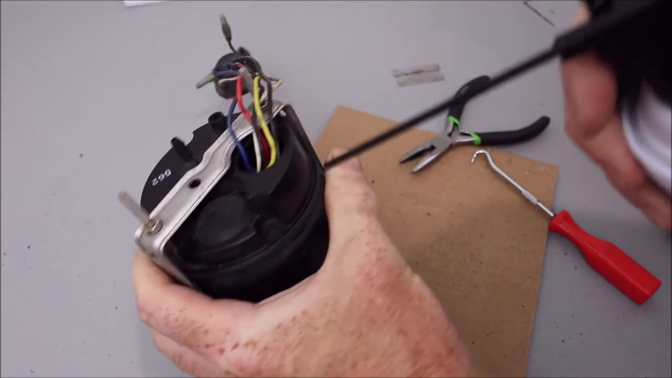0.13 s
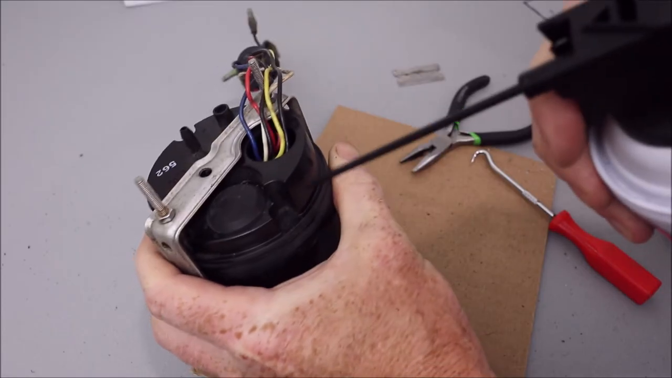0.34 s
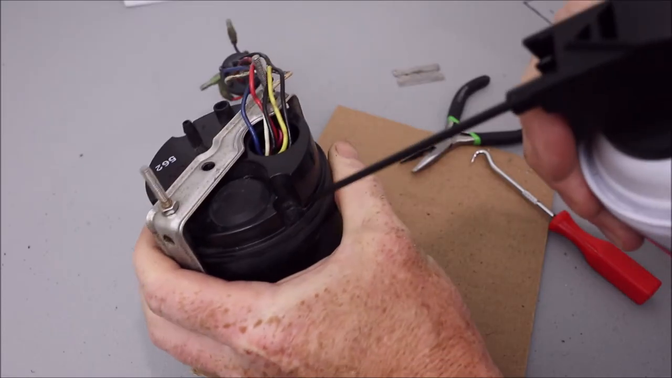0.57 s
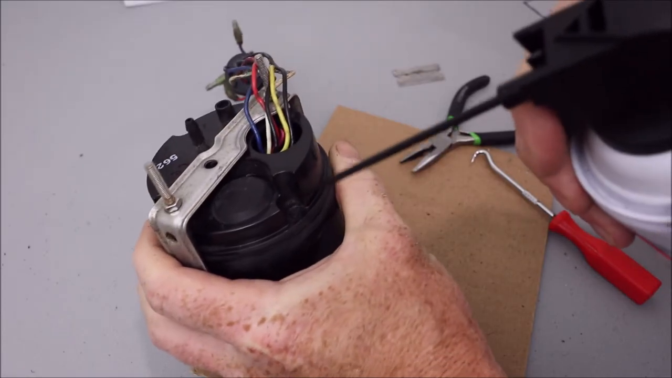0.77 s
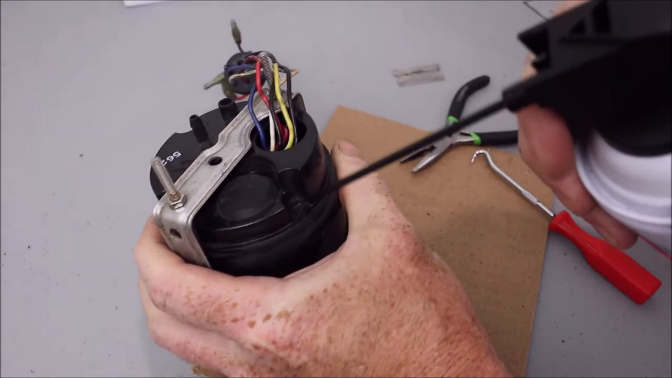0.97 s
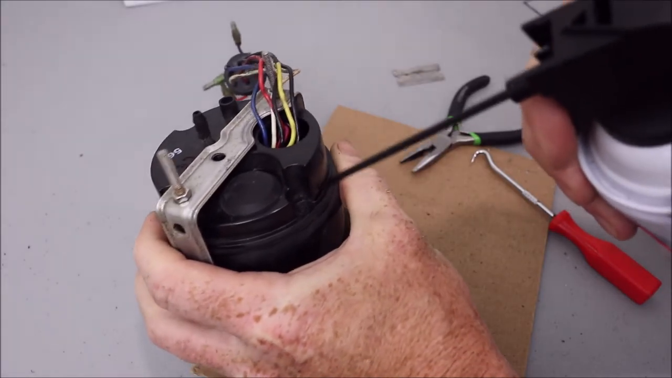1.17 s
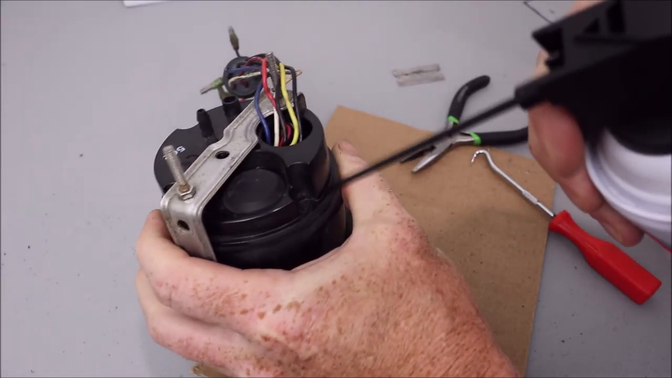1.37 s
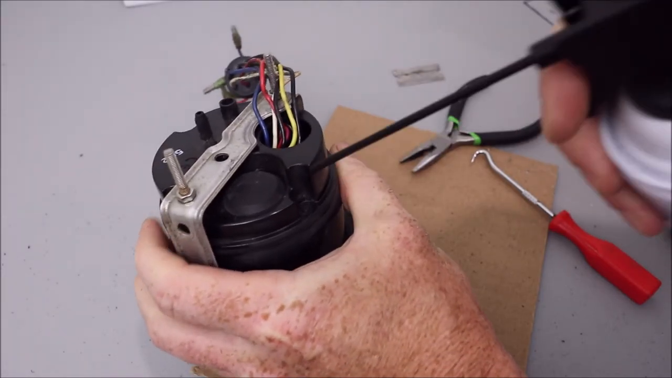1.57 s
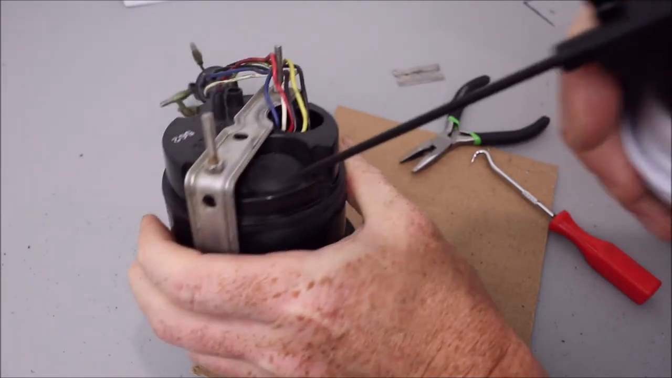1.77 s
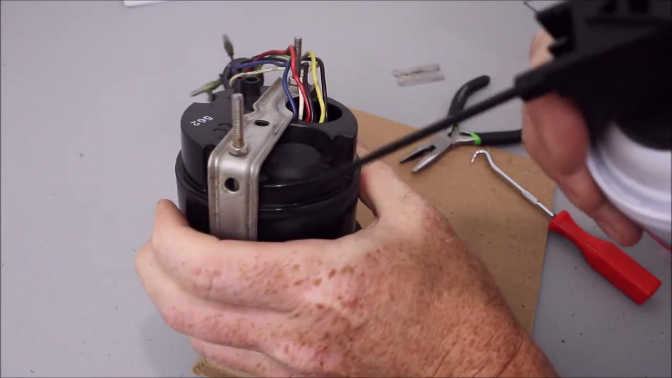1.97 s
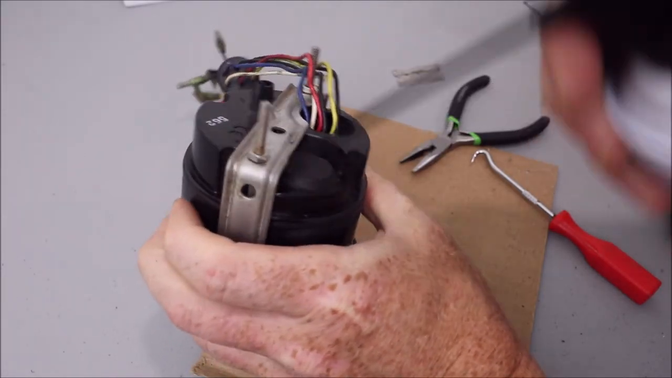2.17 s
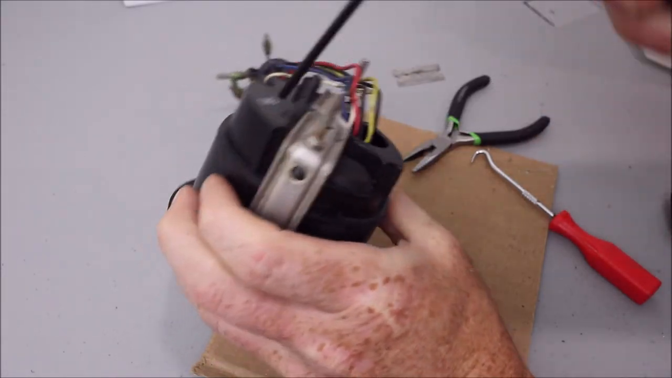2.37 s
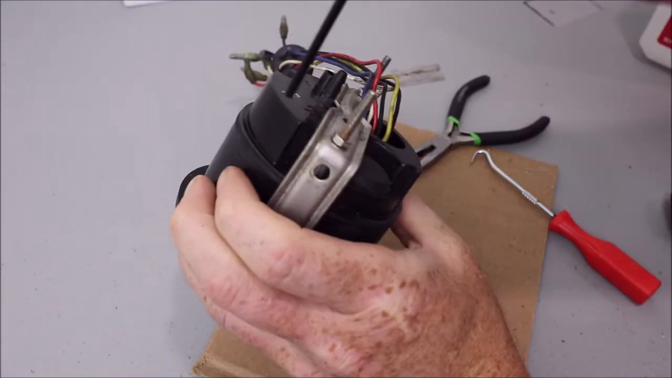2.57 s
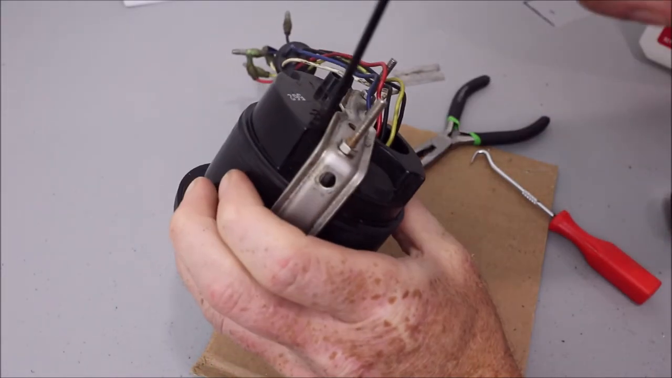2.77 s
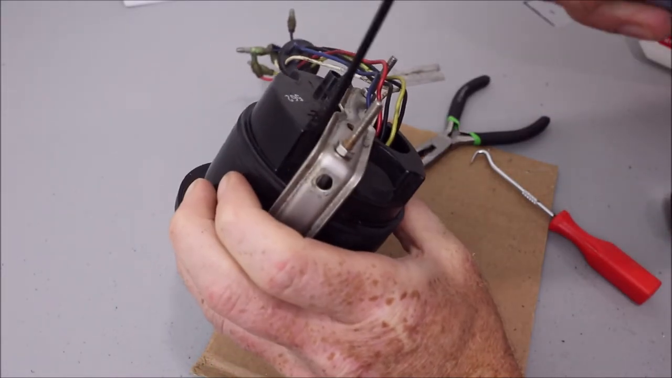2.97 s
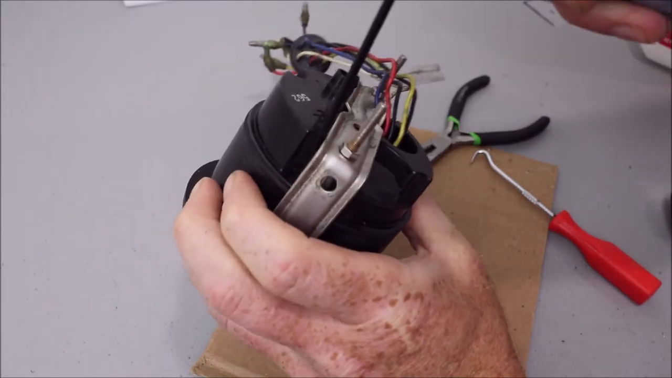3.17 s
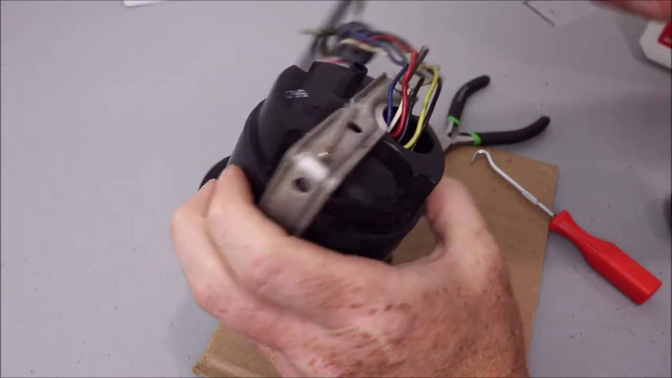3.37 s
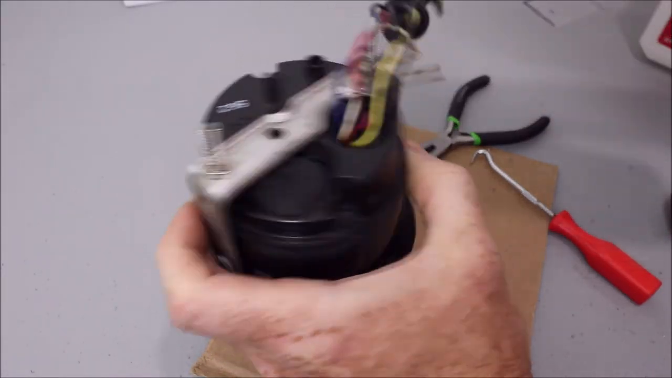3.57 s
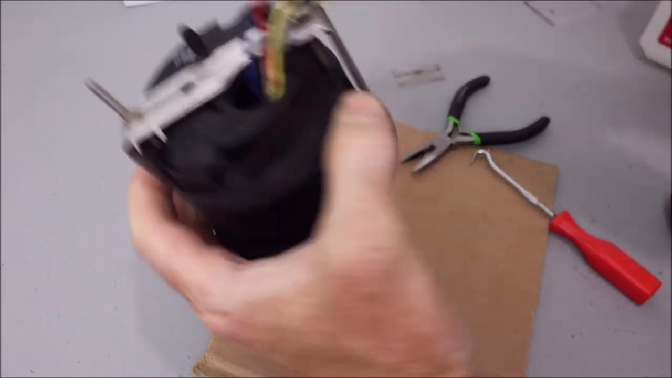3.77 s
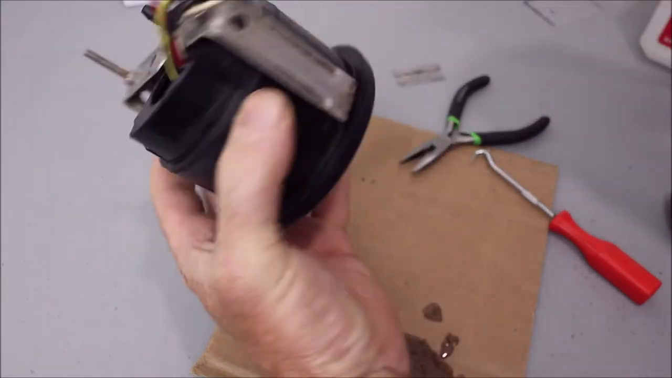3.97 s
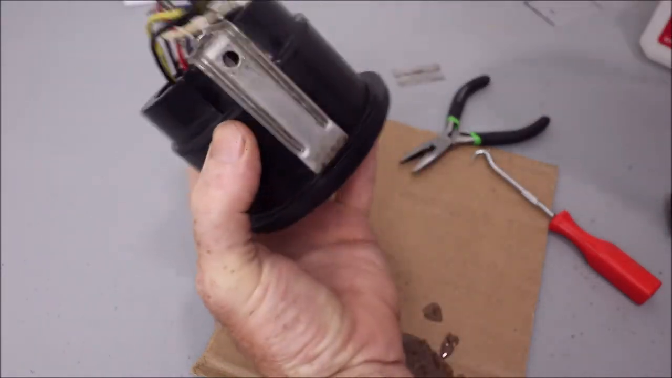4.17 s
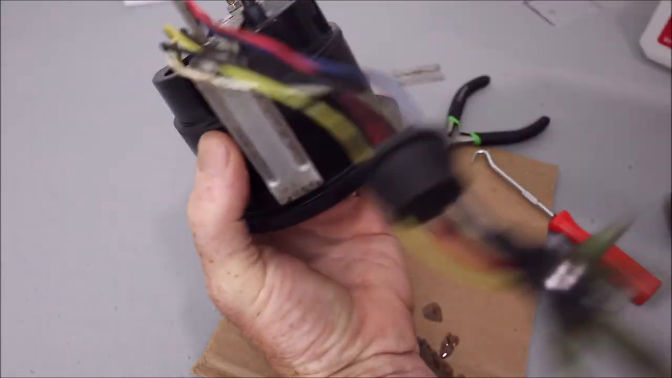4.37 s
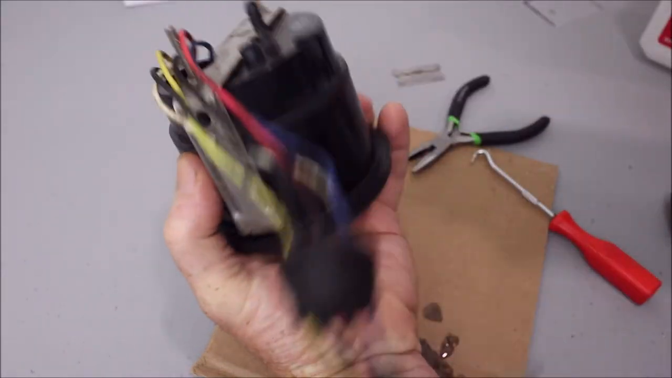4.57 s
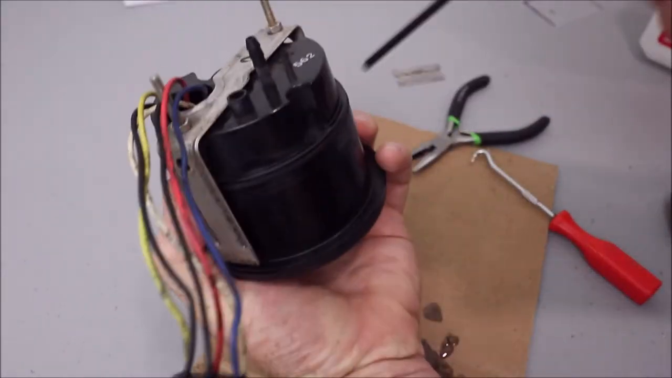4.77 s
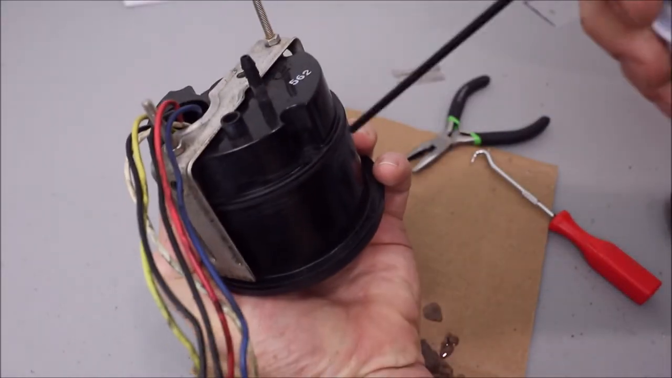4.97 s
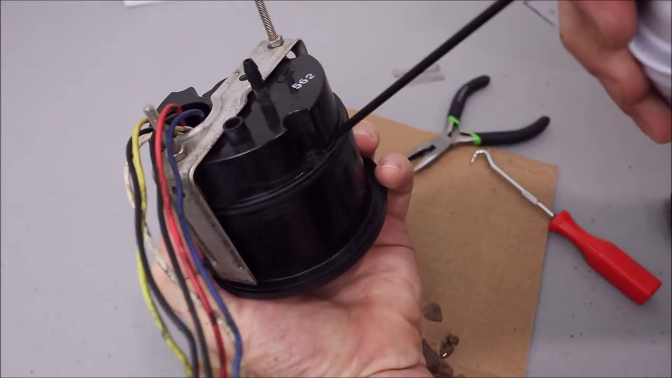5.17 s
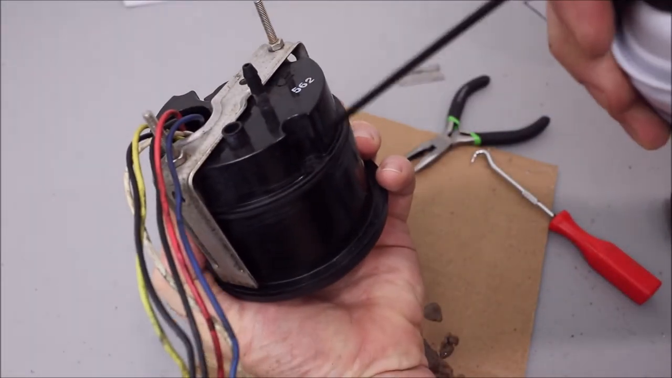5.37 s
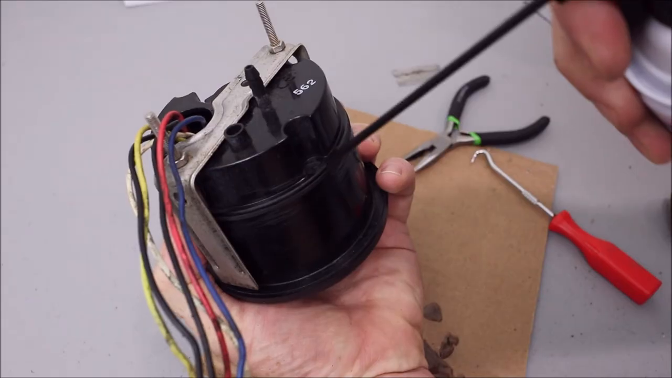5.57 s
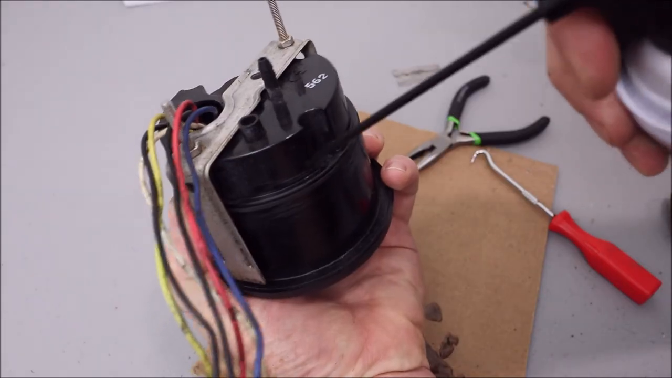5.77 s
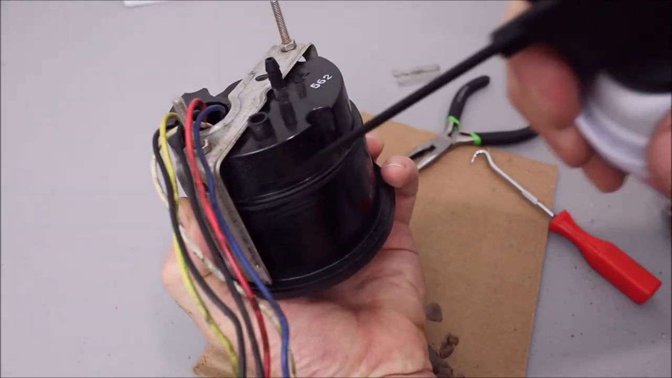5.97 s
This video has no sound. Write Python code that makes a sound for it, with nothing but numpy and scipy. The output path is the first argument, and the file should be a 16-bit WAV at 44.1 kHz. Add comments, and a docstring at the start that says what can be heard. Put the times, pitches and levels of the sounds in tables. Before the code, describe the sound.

A small indoor room with low, dull ventilation noise and very faint hum, heard close in stereo. Fingers brush plastic at the start. From 0.3 to 1.4 seconds a compressed air can gives six bright, breathy hisses, each about a tenth of a second, opening quickly and cutting off with a short room tail. A light plastic rub at 1.8 accompanies two more spurts, at 1.8 and 2.0, more focused and whistly. Another short one comes at 2.65, then a longer spray from 2.85 to 3.2. A tiny squeak at 3.4 and sparse finger ticks and rubs until 4.5 fill the gap while the background slowly swells. A short blast at 4.85 leads to a half-second spray at 5.05, dipping midway, with low puffs buffeting the microphone. The last, slightly lower-toned spray begins at 5.67, weakens briefly, and continues to 6.0.

```python
"""At a workbench in a small room, a can of compressed air blows dust off a plastic housing: thirteen blasts.
Each is rippled noise through a valve envelope, with a ringing recess, a hollow and some narrow noise bands. Low
noise puffs hit the microphone; fingers rub and tick on the plastic through its modes, and a short squeak sounds
once. Ventilation noise and humming sines run throughout; a decaying noise tail is the room. Loud sound pulls an
automatic gain down; it then creeps back, swelling the background."""
import sys
import numpy as np
from scipy import signal
from scipy.fft import rfft, irfft, next_fast_len
from scipy.io import wavfile
from scipy.ndimage import uniform_filter1d, map_coordinates

SR = 44100
rng = np.random.default_rng(int(sys.argv[2]) if len(sys.argv) > 2 else 0)


def wrap_up_sound(samples):
    """Save the sound to the file named by the first command line argument, as 16-bit audio."""
    columns = np.atleast_2d(samples).T
    # keep every value between -1 and 1, then stretch to whole-number steps
    tamed = np.clip(columns, -1, 1)
    steps = np.round(tamed * 32767).astype(np.int16)
    wavfile.write(sys.argv[1], SR, steps)


N = 265923
TIME = np.arange(N) / SR

# Ventilation spectrum. Each row: frequency in Hz, relative density in dB per Hz.
AIR_SPECTRUM = [(15, -46.5), (25, -18), (54, -10.5), (86, -12.5), (125, -1.5), (176, -2.5), (286, -1.5),
                (344, -5), (488, 2), (1630, -12), (1860, -10), (2020, -11), (9270, -27.5), (15000, -46)]
# Hum partials. Each row: frequency in Hz, relative rms level in dB.
HUM_PARTIALS = [(118.4, -66.5), (290.7, -64), (495.3, -66.5)]
# Stereo likeness of all but the jet. Each row: frequency in Hz, left-right correlation from -1 to 1.
AIR_LIKENESS = [(40, .6), (150, 1), (600, 0.98), (2000, 0.83), (4000, -.1), (8000, -.45), (13000, -.8)]
# Plastic and wires rubbing and ticking under the fingers; the first row is a faint knock at the very start.
# Each row: centre in seconds, # half-length in seconds (to e^-2), shell level in dB, scuff level in dB relative
# to the shell.
FINGER_RUBS = [(.01, 0.06, -57.5, 8.5), (0.072, 0.0098, -54, -5), (0.195, .014, -57, -18),
               (1.813, 0.039, -45, -17.5), (3.46, 0.013, -50, -7), (3.511, .014, -48, -4),
               (3.915, 0.02, -53.5, -3), (3.988, .04, -53, -20), (4.064, 0.027, -47, -17),
               (4.1, 0.0078, -45, -11.5), (4.144, 0.031, -47.5, -13.5), (4.454, 0.013, -53, -25)]
# Modes of the rubbed shell. Each row: frequency in Hz, nominal width in Hz, relative level in dB.
SHELL_MODES = [(945, 140, -2), (1160, 90, -9), (1950, 330, -0.5), (2600, 450, -7.5), (3940, 220, -9)]
# Dry friction spectrum. Each row: frequency in Hz, relative density in dB per Hz.
SCUFF_SPECTRUM = [(500, -14.5), (2000, 1), (4000, 5), (7000, -2.5), (10000, -15.5), (14000, -40)]
# Short squeak. Each row: frequency in Hz, nominal width in Hz, relative level in dB.
SQUEAK_MODES = [(2090, 320, 2), (2910, 400, -6)]
# Room decay. Each row: frequency in Hz, time to fall 60 dB in seconds.
ROOM_T60 = [(200, 0.36), (800, 0.31), (2500, 0.35), (6000, 0.3), (13000, 0.22)]
# Trigger pulls. Each row: opening start in seconds, closing in seconds, opening time in seconds,
# mid-pull level in dB, level rise over the pull in dB, recess frequency in Hz,
# recess level in dB relative to the hiss, hollow level in dB relative to the hiss.
TRIGGER_PULLS = [(.297, 0.392, 0.068, -2.5, 2, 6250, -3, -25.5),
                 (0.481, 0.589, 0.025, -3.5, 1.5, 7260, -2.5, -19.5),
                 (0.687, 0.823, 0.038, -5, -2.5, 6600, -11, -22),
                 (0.887, 1.022, .015, -6.5, 0, 6050, -9.5, -20),
                 (1.086, 1.26, 0.013, -13.5, 7, 6900, -7, -17), (1.303, 1.434, 0.019, -8, 4, 5525, -7, -19),
                 (1.812, 1.922, 0.035, -3.5, -2.5, 5500, 5.5, -14.5),
                 (1.977, 2.102, 0.069, -3, 0, 5170, 1.5, -19.5),
                 (2.653, 2.785, 0.033, -7, 0.5, 5370, 2.5, -26.5),
                 (2.857, 3.208, .023, -8, 1, 5470, 1, -28.5), (4.838, 4.992, 0.017, -11, 6, 6940, -4, -25),
                 (5.051, 5.527, 0.015, -9, -1.5, 7300, -6.5, -25),
                 (5.668, 6.004, 0.039, -8, -3, 4270, 1.5, -18)]
# Jet hiss spectrum. Each row: frequency in Hz, relative density in dB per Hz.
JET_SPECTRUM = [(30, -40.5), (120, -30), (260, -23), (450, -14), (650, -14.5), (1000, -10.5), (1500, -7.5),
                (2300, -3), (3500, 0.5), (5000, -1), (8000, 0.5), (11000, -3), (14000, -6), (15500, -20.5)]
# Stereo likeness of the jet. Each row: frequency in Hz, left-right correlation from -1 to 1.
JET_LIKENESS = [(40, .5), (200, 0.92), (900, 0.94), (2000, .7), (3200, 0.29), (5000, -0.12), (8000, -0.37),
                (14000, -0.4)]
# Air modes of the housing. Each row: frequency in Hz, width in Hz, relative level in dB.
HOLLOW_MODES = [(429, 86, 0), (766, 45, -1), (966, 130, -1.5)]
# Finger resting lightly on the trigger. Each row: centre in seconds, half-length in seconds (to e^-2),
# level change in dB.
TRIGGER_EASES = [(5.29, 0.077, -7.5), (5.714, 0.073, -8)]
# Strongest puffs of stray air on the microphone. Each row: centre in seconds, level in dB.
STRONG_PUFFS = [(1.246, -28), (1.421, -33), (1.853, -34.5), (4.993, -28.5), (5.197, -26.5), (5.373, -29.5)]
# Puff spectrum. Each row: frequency in Hz, relative density in dB per Hz.
PUFF_SPECTRUM = [(20, -15), (70, -10), (200, 0.5), (400, 1), (900, -22.5), (3000, -62)]
# Narrow noise bands heard within the blasts; the one at 8000 Hz is only a faint narrow band of hiss.
# Each row: centre in seconds, half-length in seconds (to e^-2), frequency in Hz, nominal width in Hz,
# level in dB.
NARROW_BANDS = [(1.174, 0.041, 920, 650, -18), (1.889, 0.15, 2500, 800, -15.5),
                (2.056, 0.061, 2600, 800, -13.5), (3.06, 0.028, 5770, 450, -14),
                (3.104, 0.024, 6830, 184, -16), (3.162, 0.047, 6750, 238, -15),
                (4.92, 0.07, 8000, 370, -25), (5.802, 0.083, 1780, 1110, -23)]


def amp(db):
    """Decibels to amplitude gain."""
    return 10 ** (np.asarray(db) / 20)


def unit(x):
    """Scale to rms 1."""
    return x / np.sqrt(np.mean(x ** 2) + 1e-20)


def along(points, hz):
    """Interpolate (Hz, value) points on a log-frequency axis."""
    point_hz, values = np.transpose(points)
    return np.interp(np.log(hz + 1), np.log(point_hz), values)


def wobble(knots_per_s):
    """Smooth random curve through normally distributed knots."""
    knots = rng.standard_normal(int(N * knots_per_s / SR) + 4)
    return map_coordinates(knots, [TIME * knots_per_s])


def noise(n=N):
    """Two unrelated white noises."""
    return rng.standard_normal((2, n))


def filtered(x, response):
    """Multiply the spectrum of x by response(Hz)."""
    n = x.shape[-1]
    padded_n = next_fast_len(n + SR // 8)
    spectrum = rfft(x, padded_n) * response(np.fft.rfftfreq(padded_n, 1 / SR))
    return irfft(spectrum, padded_n)[..., :n]


def spectrum_gain(points):
    """Amplitude response through (Hz, dB) points."""
    return lambda f: amp(along(points, f))


def resonances(modes, f):
    """Sum of second-order resonances with alternating signs."""
    return sum((-1) ** k * amp(db) * 1j * f * width / (hz * hz - f * f + 1j * f * width)
               for k, (hz, width, db) in enumerate(modes))


def band(hz, width_hz):
    """Steep-sided resonance: one resonator squared."""
    return lambda f: resonances([(hz, 1.24 * width_hz, 0)], f) ** 2


def bands(modes):
    """Magnitude sum of steep-sided resonances."""
    return lambda f: sum(amp(db) * np.abs(band(hz, width)(f)) for hz, width, db in modes)


def stereo(pair, colour, likeness):
    """Mix two unrelated noises as mid and side to a set left-right correlation; colour; rms 1."""
    def mid_side_gain(f):
        angle = np.arccos(np.clip(along(likeness, f), -1, 1)) / 2
        return colour(f) * np.array([np.cos(angle), np.sin(angle)])

    mid, side = filtered(pair, mid_side_gain)
    return unit(np.array([mid + side, mid - side]))


def swell(centre_s, half_length_s):
    """Bell-shaped envelope, e^-2 at half_length_s from the centre."""
    return np.exp(-2 * np.minimum(((TIME - centre_s) / half_length_s) ** 2, 20))


def burst(centre_s, half_length_s, colour, likeness):
    """Bell-shaped swell of coloured stereo noise."""
    out = np.zeros((2, N + SR))
    start = round(max(centre_s - .25, 0) * SR)
    out[:, start:start + SR // 2] = stereo(noise(SR // 2), colour, likeness)
    return swell(centre_s, half_length_s) * out[:, :N]


def workshop(air_db=-52.5, hum_db=-2):
    """Steady ventilation noise plus hum partials with slowly wandering phase."""
    air = stereo(noise(), spectrum_gain(AIR_SPECTRUM), AIR_LIKENESS)
    hum = sum(amp(db) * np.sqrt(2) * np.sin(2 * np.pi * hz * TIME + 0.42 * wobble(3.8))
              for hz, db in HUM_PARTIALS)
    return amp(air_db) * air + amp(hum_db) * hum


def handling(grain_db=2.5, squeak_db=-34.5):
    """Tiny finger slips, and a faint knock at the start, ring the plastic shell and add dry friction noise; a
    short squeak sounds once."""
    ring_level = sum(amp(db) * swell(s, half_s) for s, half_s, db, _ in FINGER_RUBS)
    rings = ring_level * stereo(noise(), bands(SHELL_MODES), AIR_LIKENESS)
    scuff_level = sum(amp(db + scuff_db) * swell(s, half_s) for s, half_s, db, scuff_db in FINGER_RUBS)
    scuffs = scuff_level * stereo(noise(), spectrum_gain(SCUFF_SPECTRUM), AIR_LIKENESS)
    squeak = amp(squeak_db) * burst(3.401, 0.021, bands(SQUEAK_MODES), AIR_LIKENESS)
    grain = unit(amp(grain_db * wobble(400)))
    return (rings + scuffs + squeak) * grain


def room(x, delay_s=.006):
    """Convolve with a delayed noise tail whose frequencies each decay at their own rate."""
    hz, t_s, cells = signal.stft(noise(SR // 2), SR, nperseg=256)
    decay = amp(-60 * t_s / along(ROOM_T60, hz)[:, None])
    tail = signal.istft(cells * decay, SR, nperseg=256)[1]
    tail = stereo(tail, np.ones_like, AIR_LIKENESS) / np.sqrt(tail.shape[1])
    delayed = np.pad(x, ((0, 0), (round(delay_s * SR), 0)))
    return signal.fftconvolve(delayed, tail, axes=1)[:, :N]


def valve(t_s, held_s, opening_s, shut_s=0.0095):
    """Flow builds as the valve opens, then decays exponentially as the straw empties."""
    opened = np.clip(t_s / opening_s, 0, 1) ** 1.25
    return opened * np.exp(-np.maximum(t_s - held_s, 0) / shut_s)


def rippled(n, ripple_db):
    """Noise with narrow peaks and notches that drift as the straw moves among nearby surfaces."""
    cells = signal.stft(noise(n), nperseg=512)[2]
    field = uniform_filter1d(rng.standard_normal(cells.shape), size=3, axis=1)  # across frequency
    field = uniform_filter1d(field, size=18, axis=2)  # along time
    return signal.istft(cells * amp(ripple_db * unit(field)), nperseg=512)[1][:, :n]


def blasts():
    """Each pull's turbulent jet hisses, rings a recess and excites the housing's air modes."""
    out = np.zeros((2, N + SR))
    t_s = np.arange(SR // 2 + SR // 8) / SR
    n = len(t_s)
    for start_s, stop_s, opening_s, db, rise_db, recess_hz, recess_db, hollow_db in TRIGGER_PULLS:
        held_s = stop_s - start_s
        hiss = stereo(rippled(n, ripple_db=2.5), spectrum_gain(JET_SPECTRUM), JET_LIKENESS)
        recess = stereo(rippled(n, ripple_db=3.5), band(recess_hz, 0.62 * recess_hz), JET_LIKENESS)
        hollow = stereo(noise(n), lambda f: resonances(HOLLOW_MODES, f), JET_LIKENESS)
        jet = unit(hiss + amp(recess_db) * recess + amp(hollow_db) * hollow)
        pressure_db = db + rise_db * (np.minimum(t_s / held_s, 1) - .5)
        start = round(start_s * SR)
        out[:, start:start + n] += amp(pressure_db) * valve(t_s, held_s, opening_s) * jet
    sputter_db = .6 * wobble(14) + .55 * wobble(35) + .45 * wobble(160)
    ease_db = sum(db * swell(s, half_s) for s, half_s, db in TRIGGER_EASES)
    return out[:, :N] * amp(ease_db + sputter_db)


def puffs(half_length_s=0.0091, stray_db=-21.5, stray_swing_db=7.5, stray_knots_per_s=39):
    """Deflected air buffets the microphone: set puffs, plus random ones that follow the hollow's level."""
    strong = sum(amp(db) * swell(s, half_length_s) for s, db in STRONG_PUFFS)
    deflected = sum(amp(db + hollow_db) * valve(TIME - start_s, stop_s - start_s, opening_s)
                    for start_s, stop_s, opening_s, db, *_, hollow_db in TRIGGER_PULLS)
    stray = deflected * amp(stray_db + stray_swing_db * wobble(stray_knots_per_s))
    return (strong + stray) * stereo(noise(), spectrum_gain(PUFF_SPECTRUM), AIR_LIKENESS)


def flowing():
    """Valve flow summed over all pulls."""
    return sum(valve(TIME - start_s, stop_s - start_s, opening_s)
               for start_s, stop_s, opening_s, *_ in TRIGGER_PULLS)


def narrow_bands():
    """Narrow noise bands heard within the blasts: brief resonant noise gated by the valve flow."""
    swells = sum(amp(db) * burst(s, half_s, band(hz, width_hz), JET_LIKENESS)
                 for s, half_s, hz, width_hz, db in NARROW_BANDS)
    return flowing() * swells


def scene(room_db=-9.0, handling_room_db=-14):
    """Jet and hand, each with its room send, plus dry puffs and background."""
    hand = handling()
    jet = (blasts() + narrow_bands()) * amp([[.35], [-.35]])  # slightly left
    reflections = room(amp(room_db) * jet + amp(handling_room_db) * hand)
    return jet + hand + reflections + puffs() + workshop()


def gain_control(x, limit_db=-17.0, attack_s=0.017, release_db_per_s=9, start_cut_db=11):
    """Smoothed power above the limit sets the gain cut, which then releases at a steady rate."""
    k = np.exp(-1 / (attack_s * SR))
    power = signal.lfilter([1 - k], [1, -k], np.mean(x ** 2, axis=0))
    excess_db = np.maximum(10 * np.log10(power + 1e-12) - limit_db, 0)
    released_db = release_db_per_s * TIME
    # a running peak on a rising ramp, less the ramp, holds peaks that fall linearly
    held_db = np.maximum(np.maximum.accumulate(excess_db + released_db), start_cut_db)
    return x * amp(released_db - held_db)


def record(dry, top_hz=15400):
    """Gain control, then a steep low-pass."""
    return filtered(gain_control(dry), lambda f: 1 / (1 + (f / top_hz) ** 160))


dry = scene()
out = record(dry)
wrap_up_sound(out)
```